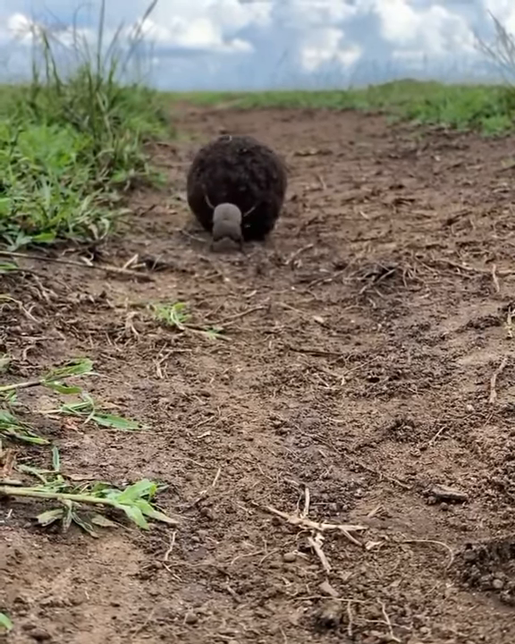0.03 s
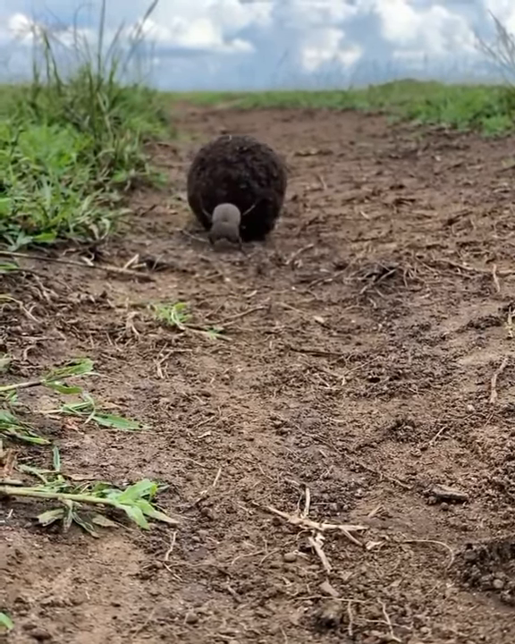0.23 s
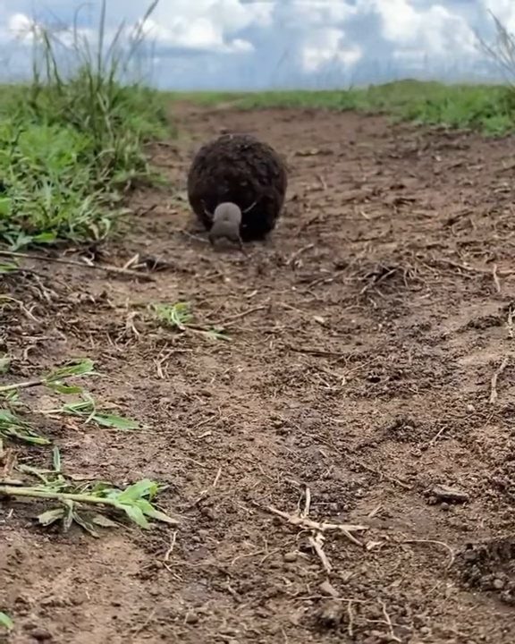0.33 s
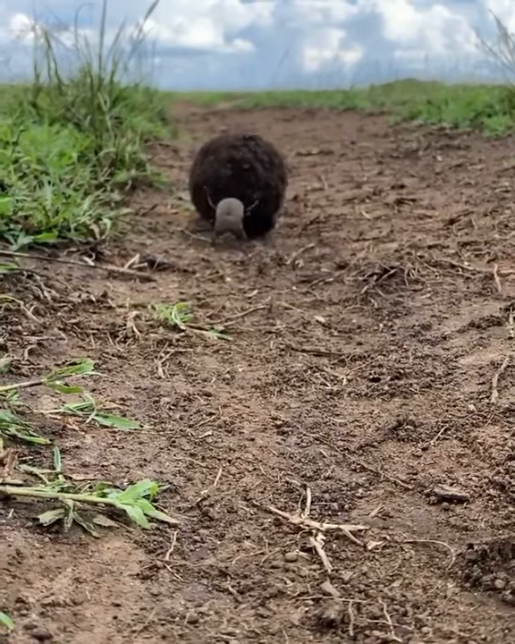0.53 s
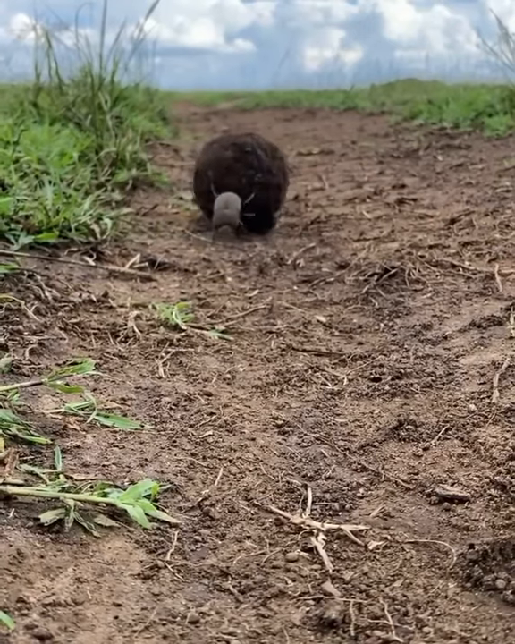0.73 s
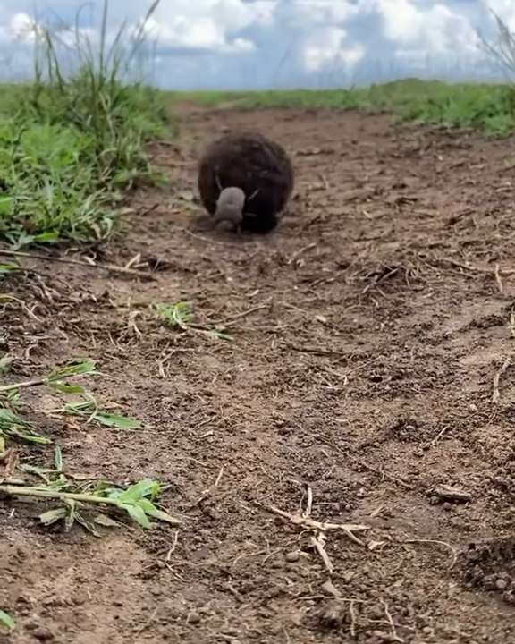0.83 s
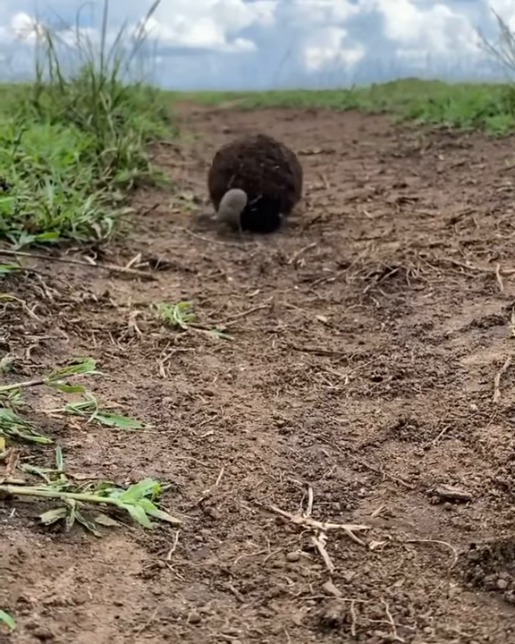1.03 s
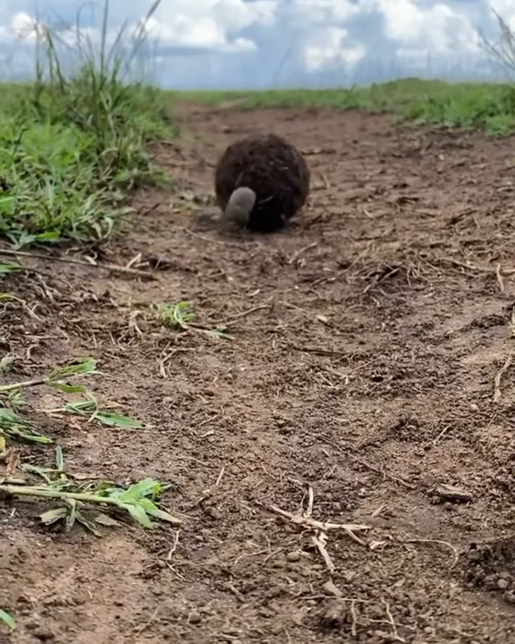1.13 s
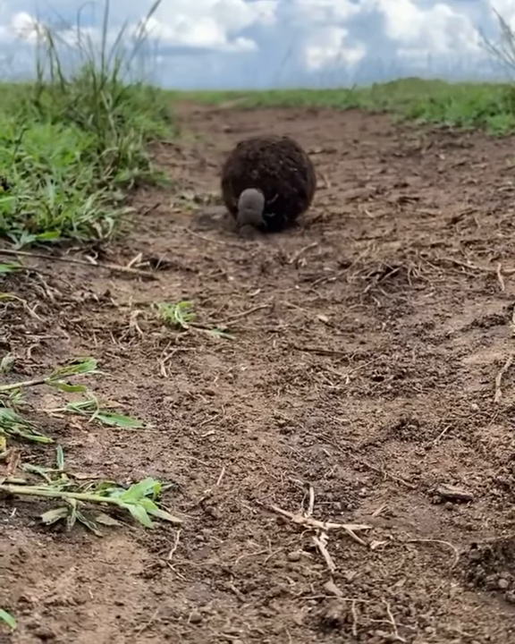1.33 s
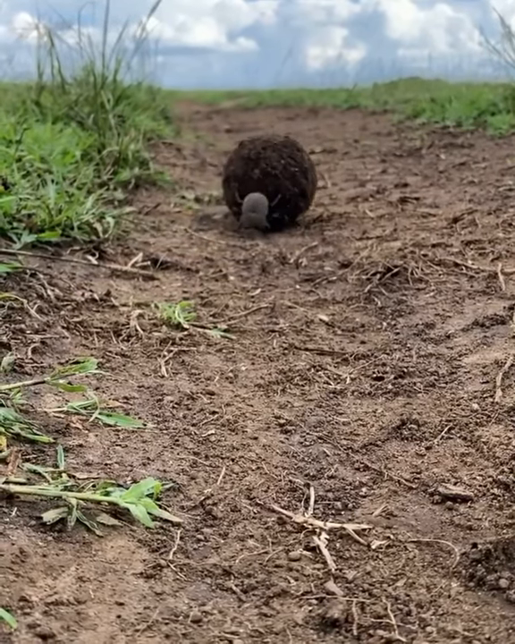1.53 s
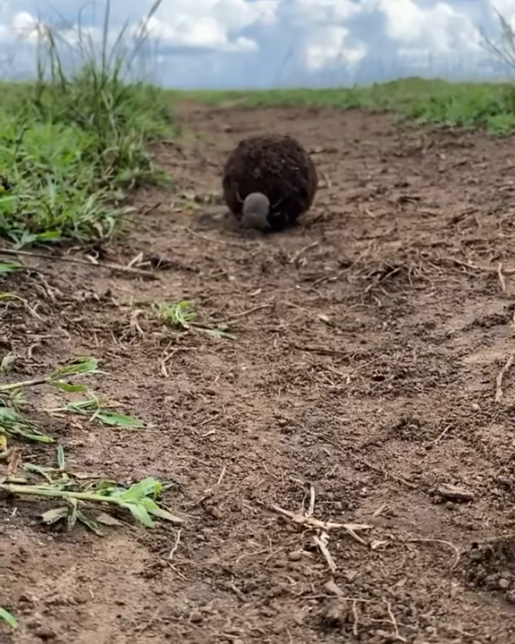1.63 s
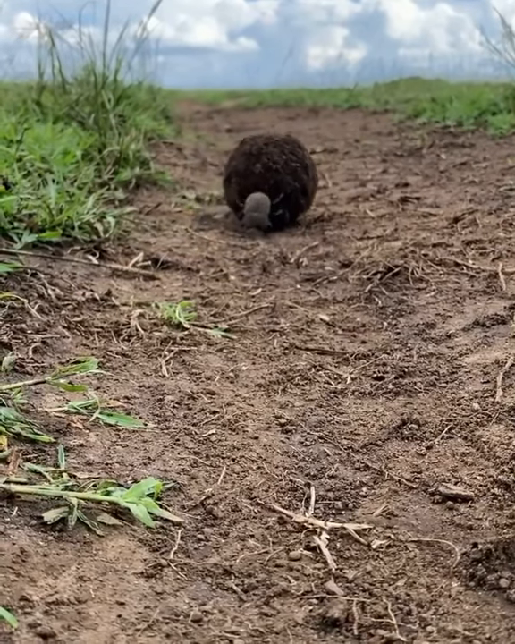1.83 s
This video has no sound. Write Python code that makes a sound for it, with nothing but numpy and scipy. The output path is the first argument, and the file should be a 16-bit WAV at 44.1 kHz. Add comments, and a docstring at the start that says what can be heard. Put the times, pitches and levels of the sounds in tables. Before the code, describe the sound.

Faint birds call far across a field, heard on a hand-held microphone with low rumble and soft hiss. Dull handling bumps overlap a brief whistle and three chirps; tiny ticks follow, then three more chirps with one close click.

```python
"""Open grassland in still air, on a hand-held stereo microphone. A faint hiss and the rumble of the grip
run throughout. First a distant bird holds a thin whistle; before it ends, another gives three arched
chirps while the hand bumps the housing, hardest at 0.24 s. A few dry ticks follow close by. From 1.4 s
three more chirps come, and one sharp click sounds near the microphone just after the first of them."""
import sys
import numpy as np
from scipy import signal
from scipy.fft import rfft, irfft, next_fast_len
from scipy.io import wavfile
from scipy.ndimage import uniform_filter1d, map_coordinates

SR = 44100
rng = np.random.default_rng(int(sys.argv[2]) if len(sys.argv) > 2 else 0)


def to_wav(sig):
    """Store sig (one row per channel, or 1-D mono) as 16-bit WAV at the path in sys.argv[1].

    Samples outside -1..1 are clipped; the rate is SR.
    """
    pcm = np.clip(np.atleast_2d(sig), -1, 1) * 32767
    pcm = np.round(pcm).astype(np.int16)
    wavfile.write(sys.argv[1], SR, pcm.T)  # frames by channels


N = 83790

# hiss of the open air: f/Hz, relative level/dB
AIR_COLOUR = [(240, -21), (400, -0.5), (542, -6), (645, -8.5), (875, -9.5), (1430, -9.5), (1560, -9.5),
              (1700, -11), (2750, -16), (3730, -16), (8640, -25.5), (11000, -29), (12800, -29),
              (16600, -65.5), (22000, -120)]
# stereo image of the hiss: f/Hz, left-right likeness
AIR_LIKENESS = [(400, -0.22), (1000, -0.53), (3000, 0.23), (10000, -0.17)]
# rumble of the grip: f/Hz, relative level/dB
GRIP_COLOUR = [(15, -42.5), (25, -24.5), (40, -4.5), (60, 4.5), (90, 0), (135, -2.5), (180, -5), (270, -18),
               (350, -18), (440, -34), (700, -47), (1500, -100)]
# its rise and fall: t/s, level/dB
GRIP_LEVEL = [(0, -57.5), (.18, -63.5), (.3, -60), (.49, -64.5), (.64, -70), (.74, -68), (.81, -60.5),
              (.88, -70), (.97, -65), (1.12, -67.5), (1.23, -59.5), (1.33, -70), (1.41, -65), (1.5, -69.5),
              (1.74, -67.5), (1.9, -65.5)]
# soft bumps of the hand: t/s, level/dB, f/Hz, half length/s
HAND_BUMPS = [(.006, -55.5, 68.8, 0.011), (0.128, -37, 84.4, 0.011), (.244, -18, 118, .0055),
              (0.256, -34.5, 65.4, 0.0082), (.284, -36.5, 75, 0.008), (0.313, -36.5, 136.7, 0.0045),
              (.333, -32, 97, 0.013), (0.363, -39, 70, 0.0068), (0.44, -38.5, 68.2, .012),
              (.49, -50.5, 68, 0.0053), (.538, -43, 120, 0.0037), (.576, -52, 82, 0.01),
              (.806, -48, 86, 0.0037), (.948, -57.5, 70.5, 0.017), (1.178, -57, 76.3, 0.008),
              (1.208, -52.5, 111.5, .012), (1.245, -58, 76.5, 0.015), (1.386, -56.5, 71.3, 0.017),
              (1.441, -50, 92, 0.0065), (1.525, -53, 69.4, 0.013), (1.616, -45.5, 93, 0.0062),
              (1.704, -51.5, 143, 0.0096), (1.724, -58.5, 62.7, .01)]
# small hollow knocks on the housing: t/s, level/dB, f/Hz, half length/s
HOUSING_KNOCKS = [(.237, -48.5, 249, 0.006), (.314, -46.5, 230.3, 0.012), (.378, -67, 387, 0.01),
                  (.535, -58.5, 242, 0.0042), (.795, -59.5, 211, 0.013), (.826, -59, 164, 0.011),
                  (1.194, -61, 443, 0.0024)]
BUMP_SAG, BUMP_SHARPNESS = 0.18, 2.7  # pitch fall per half length, steepness of the swell
BUMP_TAIL, BUMP_REACH = 1.55, 3.4  # release over attack, half lengths until the fade-out

# dry ticks and rustles close by: t/s, relative level/dB, f/Hz, width/octaves, t60/s
DRY_TICKS = [(0.233, -79, 12130, 0.012, 0.094), (.675, -81.5, 3400, 0.58, 0.42),
             (.704, -65.5, 3400, 0.41, 0.03), (0.728, -70.5, 2780, 0.54, 0.016),
             (1.097, -73, 8000, 0.55, 0.017), (1.107, -66, 4170, 0.94, 0.013),
             (1.158, -60, 2630, 0.4, 0.019), (1.192, -64, 850, 0.46, 0.029)]
# rustle around the click: t/s, level/dB
RUSTLE_LEVEL = [(1.39, -100), (1.408, -85), (1.417, -68), (1.425, -74.5), (1.429, -81.5), (1.435, -71.5),
                (1.447, -87.5), (1.466, -69.5), (1.48, -82), (1.51, -102)]
# its spectrum: f/Hz, relative level/dB
RUSTLE_COLOUR = [(1000, -11), (3000, -2.5), (4400, 6), (6000, -1), (8500, 2), (11000, -22), (14000, -14)]
# snaps that make up the click: t/s, relative snap level/dB, relative ring level/dB
CLICK_SNAPS = [(1.456, -62, -75), (1.4559, -61, -91), (1.4646, -50.5, -92), (1.4656, -49, -61.5)]
# spectrum of a snap: f/Hz, relative level/dB
SNAP_COLOUR = [(600, -28), (2000, 2), (4000, -12), (4900, 4), (5700, 3), (7200, -3.5), (9000, 0),
               (11000, -16), (14000, -10)]
# modes of the small hard body: f/Hz, relative level/dB, t60/s
BODY_MODES = [(962, 0.5, 0.025), (620, -38, 0.039), (1160, -6.5, 0.014), (2130, -2.5, .014),
              (4000, -1, 0.011), (5620, 7.5, 0.0075), (8850, -1, 0.0054)]
CLOSE_LIKENESS, TICK_SKIRT_DB = 0.22, -42  # left-right likeness up close; floor outside a tick's band

# note of the whistling bird: t/s, f/Hz, level/dB
WHISTLE_NOTE = [(0.038, 2800, -96.5), (.07, 2820, -86.5), (.097, 2835, -80.5), (0.133, 2760, -78),
                (.195, 2727, -81), (.228, 2800, -79.5), (0.248, 2880, -83), (0.319, 2966, -70.5),
                (.355, 2975, -84)]
# calls of the chirping bird: t of the top/s, rise/s, silent top/s, fall/s, shift of starting pitch/Hz,
# rise level/dB, fall level/dB, accent beside the top/dB, rasp 0-1, left over right/dB
BIRD_CHIRPS = [(0.2699, 0.037, .005, 0.033, -540, -68, -64, -2.5, 0.86, .3),
               (0.393, .039, .013, 0.049, 22.5, -63, -64, 0, 0.78, 1),
               (.532, .046, .014, 0.046, -0.5, -63, -68, 2, 0.6, 2),
               (1.429, 0.033, 0.0085, 0.025, -400, -75, -74, 18, 0.7, 3),
               (1.556, 0.049, 0.011, .044, 328.5, -74.5, -76.5, 12.5, 0.8, -1),
               (1.690, 0.039, 0.013, .053, 60.5, -74.5, -74, 7.5, 1, .3)]
# upward glide of a chirp: share of the stroke, f/Hz, relative level/dB
CHIRP_RISE = [(0, 3140, -9.5), (.25, 3412, -3.5), (.5, 3648, -6), (.7, 3780, -1), (.87, 4090, -9.5),
              (1, 4525, -8)]
# downward glide: share of the stroke, f/Hz, relative level/dB
CHIRP_FALL = [(0, 4542, -10), (.1, 4060, -2.5), (.19, 3757, 0.5), (.38, 3392, -6.5), (.7, 3023, -5.5),
              (.88, 2773, -5), (1, 2686, -6.5)]
RASP_HZ, RASP_SWING_HZ, RASP_SHARE = 172, 1300, .48  # flick rate, sweep at full rasp, share of the rise
FLUTTER_DB, WAVER_HZ = 1.4, 28  # unsteadiness of a stroke without rasp
ACCENT_SHARE, EDGE_S = 0.12, .003  # accent width as share of a stroke; fade at each end of a note
BIRD_LAG_S, SCATTER_DB = .00003, -11  # the birds reach the right channel later; level of their tail
TOP_HZ = 13000


def amp(db):
    return 10 ** (np.asarray(db) / 20)


def unit_rms(x):
    return x / np.sqrt(np.mean(x ** 2) + 1e-20)


def clock():
    return np.arange(N) / SR


def along(points, hz):
    """Read (f/Hz, value) points on a log frequency axis."""
    f, values = np.transpose(points)
    return np.interp(np.log(hz + 1), np.log(f + 1), values)


def curves(rows, at):
    """Each column after the first, read at the given places."""
    places, *columns = np.transpose(rows)
    return [np.interp(at, places, column) for column in columns]


def wobble(rate):
    """A smooth random curve, rate knots a second."""
    return map_coordinates(rng.standard_normal(4096), [clock() * rate + 2], mode="wrap")


def filtered(x, response):
    """Pass x through a frequency response."""
    size = next_fast_len(N + SR // 2)
    return irfft(rfft(x, size) * response(np.fft.rfftfreq(size, 1 / SR)), size)[..., :N]


def noise(gain_db, likeness=lambda hz: CLOSE_LIKENESS):
    """Stereo noise of rms 1; colour and left-right likeness are functions of frequency."""
    def mid_side_gains(hz):
        angle = np.arccos(np.clip(likeness(hz) + np.zeros_like(hz), -1, 1)) / 2
        return amp(gain_db(hz)) * np.array([np.cos(angle), np.sin(angle)])
    mid, side = filtered(rng.standard_normal((2, N)), mid_side_gains)
    return unit_rms(np.array([mid + side, mid - side]))


def tone(hz):
    """A sine that follows a pitch curve."""
    return np.sin(2 * np.pi * np.cumsum(hz) / SR)


def pan(left_db):
    return amp(np.array([[left_db], [-left_db]]) / 2)


def decay(start, t60):
    """A sudden start, then a fall of 60 dB every t60 seconds."""
    t = clock() - start
    return (t >= 0) * np.exp(-np.log(1000) * np.abs(t) / t60)


def air(level_db=-82, patch_db=1):
    """A faint, wide hiss all round the microphone, slightly patchy in time and frequency."""
    hiss = noise(lambda hz: along(AIR_COLOUR, hz), lambda hz: along(AIR_LIKENESS, hz))
    spectra = signal.stft(hiss, nperseg=512)[2]
    patches = uniform_filter1d(rng.standard_normal(spectra.shape[1:]), size=8, axis=0)
    patches = unit_rms(uniform_filter1d(patches, size=10, axis=1))
    return amp(level_db) * signal.istft(spectra * amp(patch_db * patches), nperseg=512)[1][:, :N]


def grip_rumble(lumps_db=2.5):
    """The unsteady hand on the microphone rumbles, nearly the same in both channels."""
    db, = curves(GRIP_LEVEL, clock())
    likeness = [(100, .99), (250, 0.69), (500, 0.18)]  # f/Hz, left-right likeness
    rumble = noise(lambda hz: along(GRIP_COLOUR, hz), lambda hz: along(likeness, hz))
    return amp(db + lumps_db * wobble(30)) * rumble


def housing_bumps(rows):
    """Pushes on the microphone housing: a few low cycles that swell, sag in pitch and die."""
    out = np.zeros(N)
    for at, db, hz, half_length in rows:
        age = np.clip((clock() - at) / half_length, -12, 12)  # half lengths from the peak
        stretched = np.where(age < 0, age, age / BUMP_TAIL)
        swell = np.exp(BUMP_SHARPNESS * (1 - np.hypot(1, stretched)))
        fade = np.exp(-(age / BUMP_REACH) ** 4)
        cycles = hz * half_length * (1 - np.exp(-BUMP_SAG * age)) / BUMP_SAG
        out += amp(db) * swell * fade * np.sin(2 * np.pi * cycles)
    return out


def dry_ticks():
    """Tiny dry contacts near the microphone, each a puff of noise in one band."""
    out = np.zeros((2, N))
    for at, db, centre_hz, octaves, t60 in DRY_TICKS:
        puff = noise(lambda hz: np.maximum(-6 * (np.log2((hz + 1) / centre_hz) / octaves) ** 2,
                                           TICK_SKIRT_DB))
        out += amp(db - 5.5) * decay(at, t60) * puff
    return out


def close_click(grain_db=2.5):
    """Close by, within a short rustle, quick snaps ring a small hard body."""
    t = clock()
    rustle_db, = curves(RUSTLE_LEVEL, t)
    gate = (t > RUSTLE_LEVEL[0][0]) * (t < RUSTLE_LEVEL[-1][0])
    out = amp(rustle_db + grain_db * wobble(600)) * gate * noise(lambda hz: along(RUSTLE_COLOUR, hz))
    for at, snap_db, ring_db in CLICK_SNAPS:
        out += amp(snap_db - 3.5) * decay(at, t60=.008) * noise(lambda hz: along(SNAP_COLOUR, hz))
        for mode_hz, db, t60 in BODY_MODES:
            out += amp(ring_db + db) * decay(at, t60) * np.sin(2 * np.pi * mode_hz * (t - at))
    return pan(left_db=0.3) * out


def ground_scatter(calls):
    """Grass and ground scatter the calls into a short diffuse tail, different in each channel."""
    tail = (rng.standard_normal((2, N)) * decay(0.0038, t60=.08))[:, :SR // 2]
    return signal.fftconvolve(calls, tail / np.linalg.norm(tail[0]), axes=1)[:, :N]


def whistling_bird():
    """A far bird holds one thin, wavering note that rises towards its end."""
    t = clock()
    hz, db = curves(WHISTLE_NOTE, t)
    gate = np.clip(np.minimum(t - WHISTLE_NOTE[0][0], WHISTLE_NOTE[-1][0] - t) / EDGE_S, 0, 1)
    return gate * amp(db + 1.1 * wobble(70)) * tone(hz + 7 * wobble(61))


def chirp_stroke(shape, start, length, accent_db, accent_at, shift_hz=0, rasp=0):
    """One glide of a chirp; rasp makes it less steady and breaks its opening into upward flicks."""
    t = clock() - start
    share = np.clip(t / length, 0, 1)
    hz, db = curves(shape, share)
    accent = accent_db * np.exp(-((share - accent_at) / ACCENT_SHARE) ** 2)
    unrest = 1 + 1.1 * rasp
    rattle = rasp * np.clip(3 * (1 - share / RASP_SHARE), 0, 1)
    flick_phase = (t * RASP_HZ + .06 * wobble(120)) % 1
    flick_gate = 1 - rattle * np.cos(np.pi * flick_phase) ** 4
    flick_hz = rattle * RASP_SWING_HZ * (flick_phase - .5)
    gate = np.clip(np.minimum(t, length - t) / EDGE_S + .5, 0, 1)
    level = db + accent + unrest * FLUTTER_DB * wobble(220)
    pitch = hz + shift_hz * (1 - share ** 2) + flick_hz + unrest * WAVER_HZ * wobble(300)
    return gate * flick_gate * amp(level) * tone(pitch)


def chirping_bird():
    """Far across the grass, each chirp sweeps up, breaks at the top and sweeps down again."""
    out = np.zeros((2, N))
    for top, rise, gap, fall, shift_hz, up_db, down_db, accent_db, rasp, left_db in BIRD_CHIRPS:
        start = top - gap / 2 - rise
        up = chirp_stroke(CHIRP_RISE, start, rise, accent_db, accent_at=1, shift_hz=shift_hz, rasp=rasp)
        down = chirp_stroke(CHIRP_FALL, top + gap / 2, fall, accent_db, accent_at=0)
        out += pan(left_db) * (amp(up_db) * up + amp(down_db) * down)
    return out


def scene():
    """Far birds, a little left of the microphone, over the close sounds and the hiss."""
    lead_s = np.array([[BIRD_LAG_S], [-BIRD_LAG_S]]) / 2
    birds = filtered(chirping_bird() + whistling_bird(), lambda hz: np.exp(2j * np.pi * hz * lead_s))
    distant = birds + amp(SCATTER_DB) * ground_scatter(birds)
    handling = housing_bumps(HAND_BUMPS) + housing_bumps(HOUSING_KNOCKS) + grip_rumble()
    return air() + handling + dry_ticks() + close_click() + distant


def record(dry):
    """The recorder keeps nothing above its band limit."""
    return filtered(dry, lambda hz: hz < TOP_HZ)


dry = scene()
out = record(dry)
to_wav(out)
```